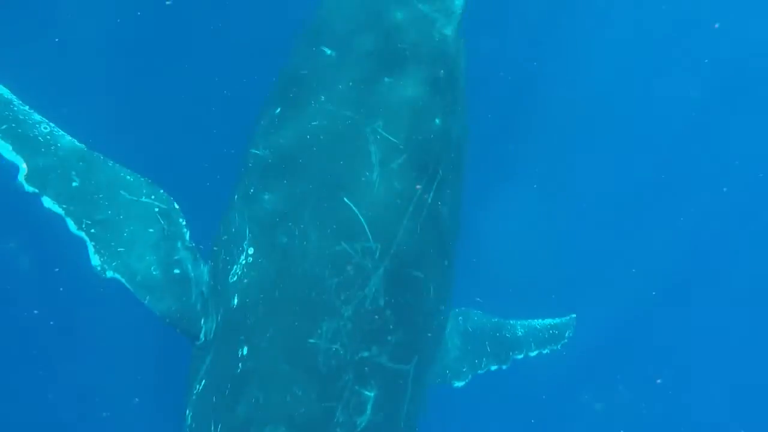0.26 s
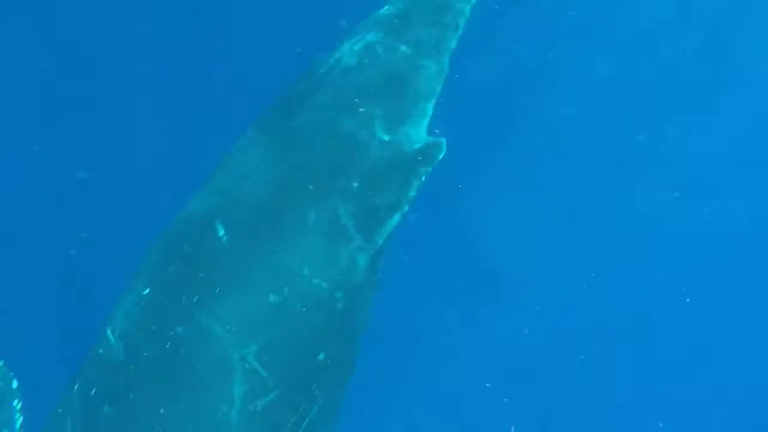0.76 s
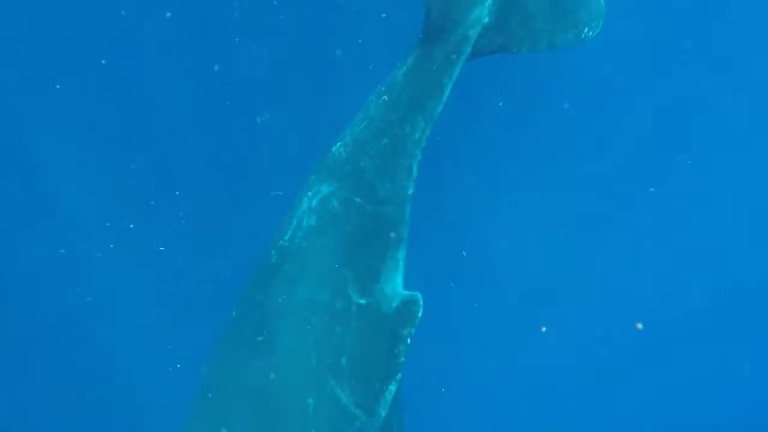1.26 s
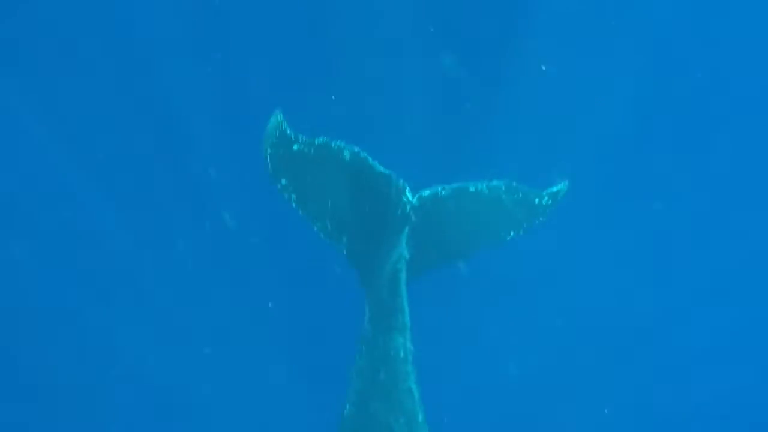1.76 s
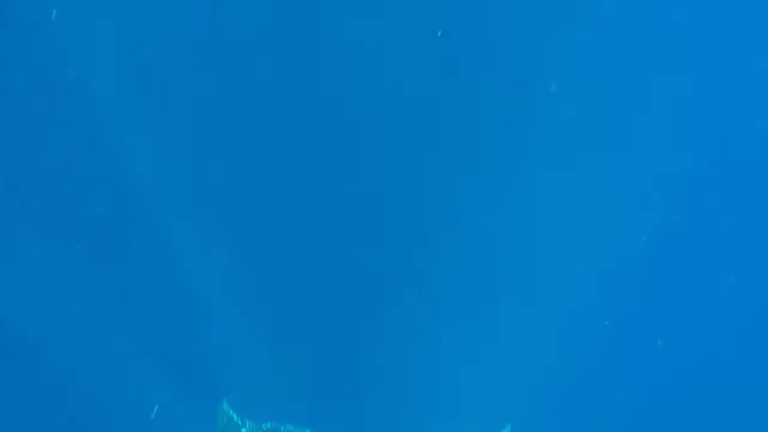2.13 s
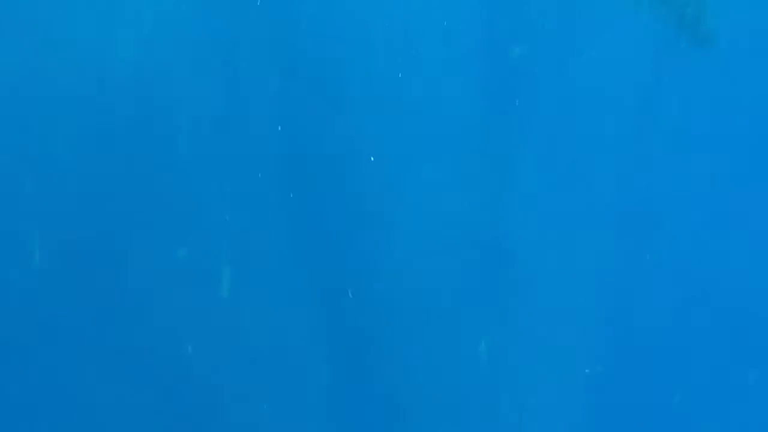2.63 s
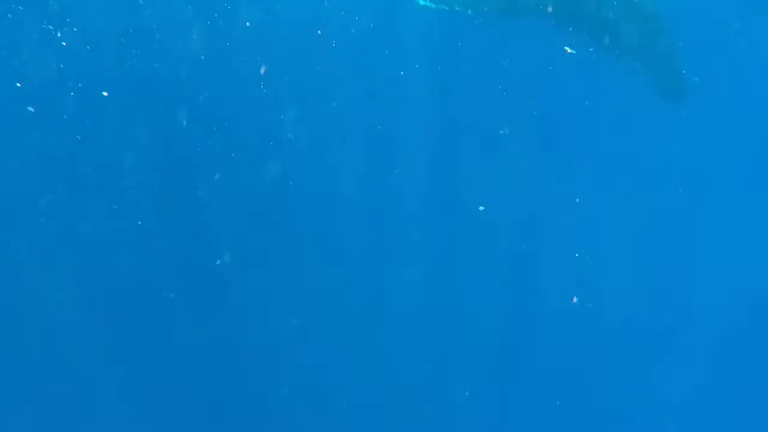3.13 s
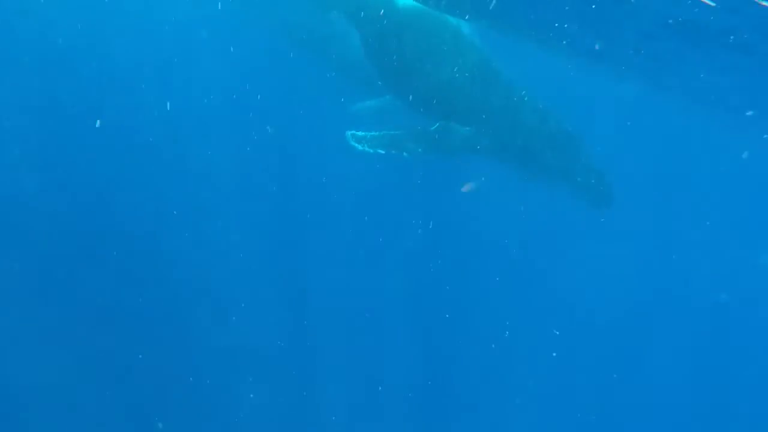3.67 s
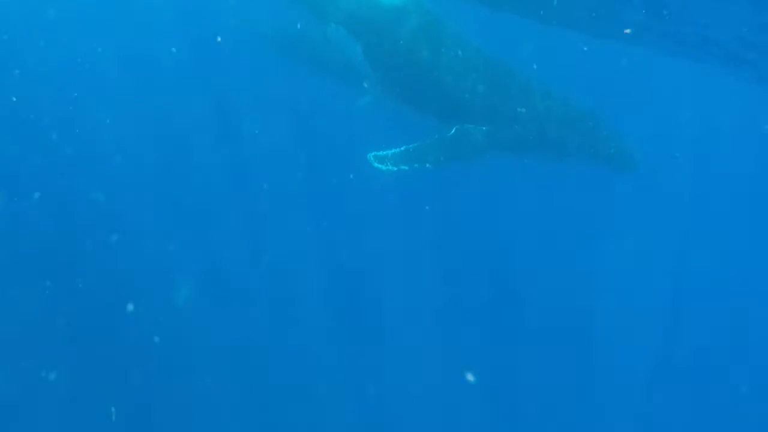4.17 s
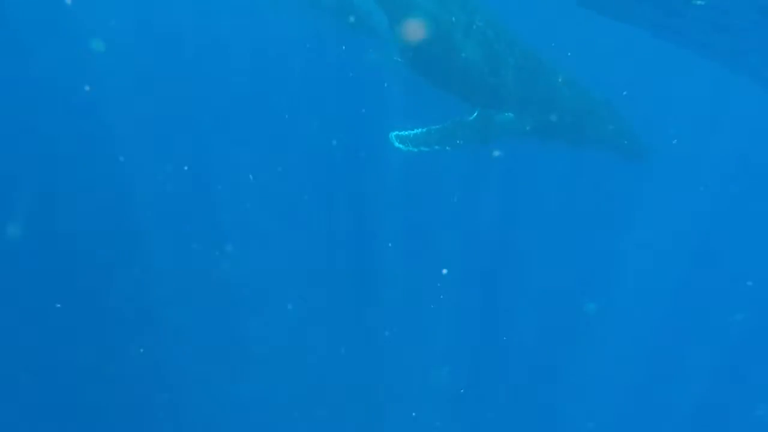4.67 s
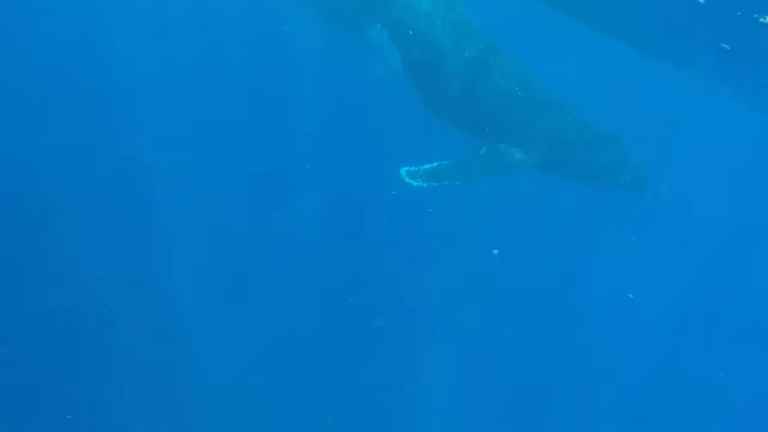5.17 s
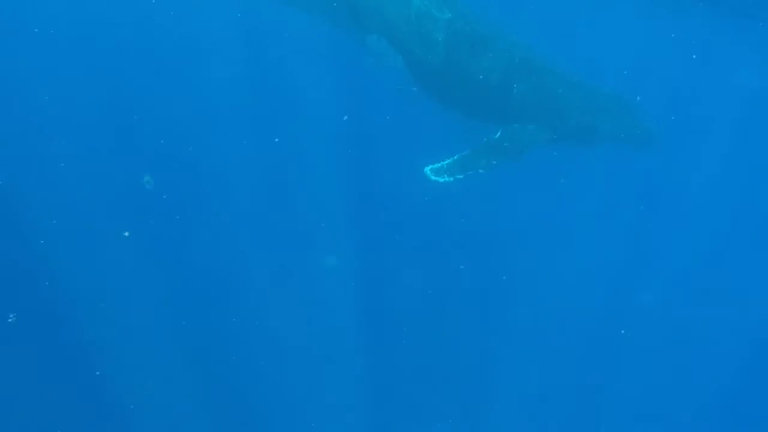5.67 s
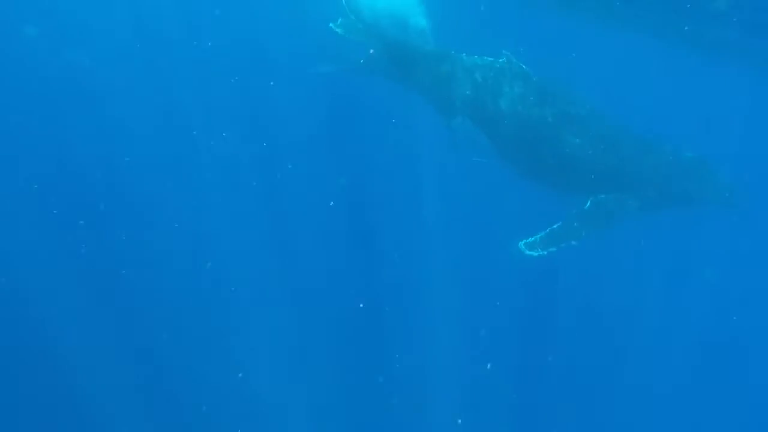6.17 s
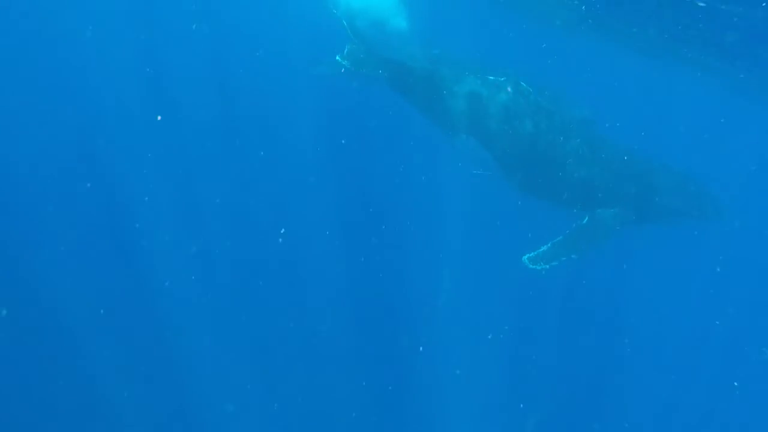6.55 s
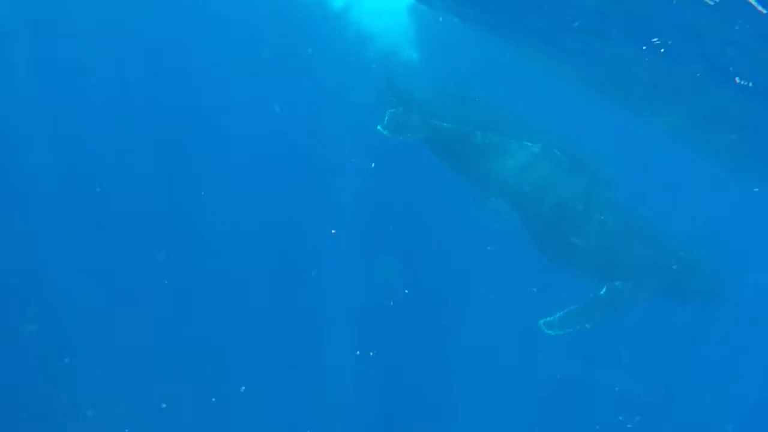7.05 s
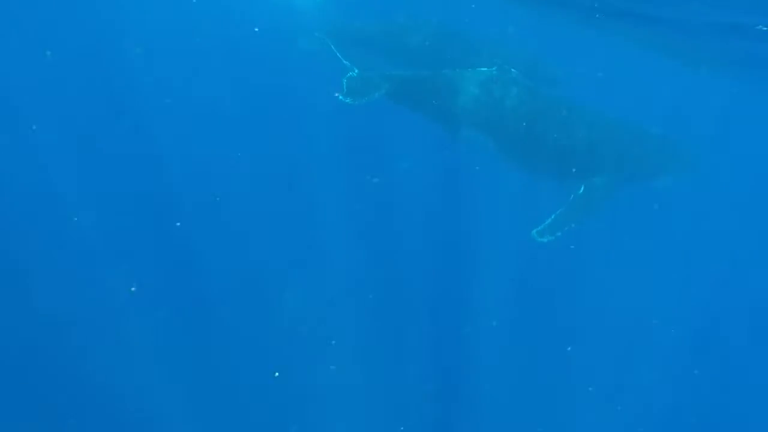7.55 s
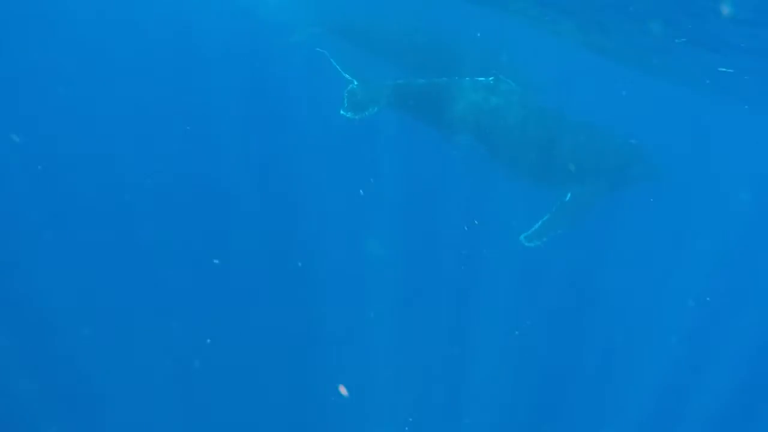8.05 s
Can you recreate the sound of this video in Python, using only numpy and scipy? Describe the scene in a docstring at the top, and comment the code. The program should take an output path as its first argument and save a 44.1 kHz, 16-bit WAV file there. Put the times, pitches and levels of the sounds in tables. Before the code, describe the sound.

Muffled underwater rumble with lumpy surges, bubbling plops and a hollow wavering moan near whales, plus a hard knock on the housing partway through.

```python
"""Water surges against a housing held under water by a swimmer near whales: shaped noise pushes,
and swarms of damped sines thud, gurgle, churn and fizz as bubbles. Noise in narrow resonances gives
a hollow low moan and a thin whine. Single bubbles slide in pitch, filtered pulses plop, and short
noise bursts snap. Treble noise hisses and swishes; pulses with damped sines click on the housing."""
import sys
import numpy as np
from scipy import signal
from scipy.fft import rfft, irfft, next_fast_len
from scipy.io import wavfile
from scipy.ndimage import uniform_filter1d, minimum_filter1d

SR = 44100
rng = np.random.default_rng(int(sys.argv[2]) if len(sys.argv) > 2 else 0)


def master(y):
    """Save y as 16-bit WAV."""
    cut = np.clip(np.atleast_2d(y).T, -1, 1)
    pcm = np.round(cut * 32767)  # scale
    wavfile.write(sys.argv[1], SR, pcm.astype(np.int16))


N = 366471
TIME = np.arange(N) / SR


def amp(db):
    """Turns decibels into a gain."""
    return 10 ** (np.asarray(db) / 20)


def evened(x):
    """Scales a sound to an average (rms) strength of 1."""
    return x / np.sqrt(np.mean(x ** 2) + 1e-20)


def steadied(x, seconds):
    """Holds the strength near 1 over stretches of about this length; faster lumps stay."""
    size = max(int(seconds * SR), 8)
    power = abs(uniform_filter1d(uniform_filter1d(x ** 2, size), size))
    return x / np.sqrt(power + 1e-20)


def curve(rows, order=1):
    """Draws straight lines through one column of a timed table."""
    columns = np.transpose(rows)
    return np.interp(TIME, columns[0], columns[order])


def coloured(x, points):
    """Makes each pitch region louder or softer, following a colour table."""
    size = next_fast_len(N + 8192)
    hz, db = np.transpose(points)
    bins_hz = np.fft.rfftfreq(size, 1 / SR)
    gain = amp(np.interp(np.log(bins_hz + 1), np.log(hz), db))
    return irfft(rfft(x, size) * gain, size)[:N]


def add(mix, s, sound):
    """Mixes a sound in at a time in seconds."""
    part = mix[max(round(s * SR), 0):][:len(sound)]
    part += sound[:len(part)]


def swell(start, length, attack_s, release_s):
    """Rises around its start, holds, then dies away."""
    rise = np.clip((TIME - start) / attack_s + .5, 0, 1)
    return rise * np.exp(-np.clip((TIME - start - length) / release_s, 0, 20))


def lumps(rate_hz, count=30):
    """Wanders unevenly with an rms of 1, by adding slow sines up to the given rate."""
    t = TIME[::256]
    rates_hz = np.linspace(rate_hz / count, rate_hz, count)
    wander = sum(np.sin(2 * np.pi * (hz * t + rng.random())) for hz in rates_hz)
    return evened(np.interp(TIME, t, wander))


def bubble(start_hz, end_hz, t60, settle=0.16, rise_cycles=0.58, rise_share=0.013):
    """A pocket of air rings as a damped sine; its pitch slides while it settles."""
    t = np.arange(int(1.3 * t60 * SR) + 16) / SR
    hz = end_hz + (start_hz - end_hz) * np.exp(-t / (settle * t60))
    rise_s = rise_cycles / start_hz + rise_share * t60  # long-ringing bubbles also start more softly
    onset = (1 - np.exp(-(t / rise_s) ** 2)) ** 2
    envelope = onset * amp(-60 * t / t60)
    return envelope / envelope.max() * np.sin(2 * np.pi * np.cumsum(hz) / SR)


def swarm(low_hz, high_hz, per_s, cycles, spread_db, count=24):
    """Bubbles of many sizes born at random, a few much louder; equal power per Hz."""
    out = np.zeros(N)
    for hz in np.geomspace(low_hz, high_hz, count):
        ring = bubble(hz * rng.uniform(1.0, 1.1944), hz, cycles / hz)
        births_here = int(per_s * N / SR / count)
        when, strength, sign = rng.random((4000, 3))[:births_here].T
        loudness_db = spread_db * np.minimum(-np.log(1 - strength), 4)
        size = amp(loudness_db) * np.sign(sign - .5)
        births = np.bincount((when * N).astype(int), size, N)
        out += signal.oaconvolve(births, ring * np.sqrt(hz) / np.linalg.norm(ring))[:N]
    return evened(out)


def fuzzy_tone(hz, width_hz):
    """Noise in a narrow resonance that follows a pitch."""
    turn = np.exp(2j * np.pi * np.cumsum(hz * np.ones(N)) / SR)
    r = np.exp(-np.pi * width_hz / SR)
    drive = rng.standard_normal(N) + 1j * rng.standard_normal(N)
    slow = signal.lfilter([1], np.poly([r, r]), drive)  # the same damping twice
    return steadied((turn * slow).real, 0.088)  # turning lifts it to the pitch


# surges of water against the housing, before the layer trims:
# start_s, length_s, push_db, thud_db, gurgle_db
SURGES = [(0, 0.043, -30, -34, -19.5), (0.548, 0.061, -16, -34, -24.5), (1.015, 0.12, -17.5, -21.5, -21),
          (1.22, 0.34, -15.5, -22.5, -30), (1.564, 0.14, -16.5, -15, -33), (1.908, 0.15, -16, -27.5, -34),
          (2.569, 0.1, -17.5, -23, -15), (2.69, 0.078, -12, -12.5, -28.5),
          (2.787, 0.08, -15.5, -8.5, -16.5), (2.92, 0.048, -28, -29, -15.5),
          (3.199, 0.014, -34, -17.5, -19.5), (3.544, 0.032, -14.5, -17.5, -20),
          (3.584, 0.047, -25, -8.5, -25), (3.693, 0.04, -30, -11.5, -39), (3.814, 0.072, -16.5, -18, -22.5),
          (3.944, 0.17, -24.5, -34, -29), (4.445, 0.28, -16.5, -18.5, -37), (4.8, 0.045, -19, -29, -29),
          (5.096, 0.072, -21, -7.5, -17.5), (5.193, 0.077, -24, -10.5, -16), (5.266, .035, -22, -6, -29),
          (5.36, 0.039, -21.5, -20, -31), (5.428, 0.11, -20.5, -18.5, -35.5),
          (5.581, 0.051, -16.5, -19, -34.5), (5.646, 0.07, -23, -39, -47),
          (6.233, 0.031, -15.5, -13, -21.5), (6.306, 0.13, -16, -16, -25.5), (6.851, 0.093, -14, -15, -26),
          (6.987, 0.21, -11.5, -21.5, -25.5), (7.237, 0.13, -10, -11.5, -30),
          (7.648, 0.078, -22.5, -21.5, -41), (7.85, 0.079, -19.5, -17.5, -33),
          (8.02, 0.088, -20, -15.5, -32)]
SURGE_ATTACK_S, SURGE_RELEASE_S = 0.0043, 0.0086


def surging():
    """Strength of push, thud and gurgle as the surges pass; the strongest one counts."""
    level = 0
    for start, length, *surge_db in SURGES:
        shape = swell(start, length, SURGE_ATTACK_S, SURGE_RELEASE_S)
        level = np.maximum(level, amp(surge_db)[:, None] * shape)
    return level


# colour filter of the push: pitch_hz, gain_db
FLOW_COLOUR = [(5, -22.5), (15, -15), (26, 5.5), (45, -3), (62, 1.5), (80, -15.5), (120, -23.5), (400, -79),
               (2000, -130)]
# colour filter of the thuds: pitch_hz, gain_db
THUD_COLOUR = [(35, -17), (60, -8.5), (80, 4), (125, 1), (160, -9.5), (210, -16), (500, -61)]
# colour filter of the gurgle: pitch_hz, gain_db
GURGLE_COLOUR = [(100, -22), (150, 4), (180, -1.5), (280, 0.5), (335, 1.5), (450, -27), (800, -57.5)]
# wash between the surges, before lumps and layer trims: time_s, rumble_db, gurgle_db
WASH = [(0, -22.5, -23), (.8, -26.5, -30.5), (1.3, -20, -26), (1.8, -29, -25.5), (2.4, -25, -22.5),
        (2.85, -21, -29), (3.08, -24.5, -39), (3.35, -31.5, -37), (3.65, -20.5, -32.5), (4.3, -36, -29),
        (4.7, -32, -38), (4.95, -28.5, -31.5), (5.25, -16, -34), (5.8, -34.5, -43), (6.3, -22.5, -28),
        (6.62, -39.5, -31), (7.3, -19, -25), (7.55, -26, -33), (8.31, -21.5, -30.5)]
WASH_THUD_DB = -3.5  # thuds of the wash, relative to its rumble
WASH_LUMPS_DB, WASH_LUMPS_HZ = 2, 9  # rms size and fastest rate of the lumps
PUSH_DB, THUD_DB, GURGLE_DB = 1, -2, -0.3  # layer trims


def flow(surges):
    """Surges push and thud on the housing and set big air pockets gurgling, over a lumpy wash."""
    push = steadied(coloured(rng.standard_normal(N), FLOW_COLOUR), 0.2)
    big = swarm(50.3, 216.0, per_s=120, cycles=8.0, spread_db=1.0)
    thuds = steadied(coloured(big, THUD_COLOUR), 0.049)
    pockets = swarm(127.0, 423.0, per_s=110, cycles=14.8, spread_db=2.0)
    gurgle = steadied(coloured(pockets, GURGLE_COLOUR), 0.064)
    rumble_db = curve(WASH)
    wash = amp([rumble_db, rumble_db + WASH_THUD_DB, curve(WASH, order=2)])
    wash = wash * amp(WASH_LUMPS_DB * lumps(WASH_LUMPS_HZ))
    layers = [push * amp(PUSH_DB), thuds * amp(THUD_DB), gurgle * amp(GURGLE_DB)]
    return (np.maximum(wash, surges) * layers).sum(axis=0)


# centre pitch of the moan: time_s, pitch_hz
MOAN_PITCH = [(0, 421.7), (1, 423.8), (1.3, 380.3), (1.9, 389.6), (2.4, 354.5), (2.8, 359.5), (3.7, 400),
              (6.3, 386.9), (7.3, 394.8), (8.3, 398.4)]
# swells of the moan, level at mid-swell before lumps: start_s, length_s, level_db
MOANS = [(0, 0.74, -23), (0.607, 0.9, -25), (1.2, 0.6, -17.5), (1.726, 0.74, -17), (2.578, 0.23, -21),
         (3.615, 0.69, -26.5), (4.327, 0.045, -24), (5.03, 0.25, -21), (5.356, 0.12, -29),
         (5.498, 0.18, -34), (6.094, 0.26, -22), (6.569, 0.28, -24), (6.893, 0.53, -31), (7.108, 0.28, -18),
         (8.096, 0.27, -35.5)]
MOAN_ATTACK_S, MOAN_RELEASE_S = 0.061, 0.05
MOAN_ARCH_DB, MOAN_REST_DB = 5, -66  # drop from the middle of a swell to its ends; level between swells
MOAN_WIDTH_HZ, MOAN_CORE_WIDTH_HZ = 110, 28.6  # each resonance is applied twice
MOAN_CORE_DB = 1.25  # core relative to the wide tone
MOAN_LUMPS_DB, MOAN_LUMPS_HZ = 0.9, 10  # the moan throbs unevenly


def moan():
    """A hollow tone of resonant noise with a clearer core, which comes in arching swells."""
    pitch = curve(MOAN_PITCH)
    wide = fuzzy_tone(pitch, MOAN_WIDTH_HZ)
    core = fuzzy_tone(pitch, MOAN_CORE_WIDTH_HZ)
    tone = wide + amp(MOAN_CORE_DB) * core
    level = amp(MOAN_REST_DB)
    for start, length, db in MOANS:
        off_centre = np.clip(2 * (TIME - start) / length - 1, -1, 1)
        arch = amp(db - MOAN_ARCH_DB * off_centre ** 2)
        level = np.maximum(level, arch * swell(start, length, MOAN_ATTACK_S, MOAN_RELEASE_S))
    return steadied(tone, 0.12) * level * amp(MOAN_LUMPS_DB * lumps(MOAN_LUMPS_HZ))


# colour filter of the churning bubbles: pitch_hz, gain_db
CHURN_COLOUR = [(180, -20.5), (330, -2.5), (450, 1), (560, -1), (700, -5.5), (800, -11), (895, -9.5),
                (980, -18), (1120, -30), (1500, -55), (2500, -52.5)]
# bubbles churning at the surface, before trim and lumps: time_s, level_db
CHURN = [(0.0, -24.5), (.33, -29.5), (0.71, -23), (1.48, -31.5), (1.83, -27), (2.1, -27), (2.64, -29.5),
         (3.01, -42), (3.63, -37.5), (4.4, -38.5), (4.95, -29), (5.37, -40), (5.76, -41), (6.04, -39),
         (6.2, -34.5), (7.13, -33), (7.48, -41), (7.8, -46), (8.31, -34.5)]
CHURN_DB = 2  # trim
CHURN_LUMPS_DB, CHURN_LUMPS_HZ = 1.0, 6
# bursts of churning bubbles: start_s, length_s, level_db
BURSTS = [(0.239, 0.028, -22.5), (2.735, 0.051, -26), (2.934, 0.0067, -27), (3.434, 0.07, -27),
          (4.497, 0.0081, -19.5), (5.072, 0.082, -27), (5.545, 0.0074, -29), (6.308, 0.031, -24),
          (7.1, 0.019, -22.5)]
BURST_ATTACK_S, BURST_RELEASE_S = 0.0096, 0.02


def churn():
    """A dense crowd of middling bubbles rings at the surface, with short louder bursts."""
    crowd = swarm(309.3, 1434.5, per_s=1100, cycles=43.6, spread_db=1.5, count=36)
    crowd = coloured(crowd, CHURN_COLOUR)
    level = amp(curve(CHURN) + CHURN_DB + CHURN_LUMPS_DB * lumps(CHURN_LUMPS_HZ))
    for start, length, db in BURSTS:
        level = np.maximum(level, amp(db) * swell(start, length, BURST_ATTACK_S, BURST_RELEASE_S))
    return steadied(crowd, 1.0) * level


# spells in which the top of the hiss fades: start_s, length_s, depth_db
DULL_SPELLS = [(3.04, 0.36, -7), (4.13, 0.19, -11), (5.295, 0.32, -2), (7.194, 0.5, -2)]
DULL_FADE_S, DULL_ABOVE_HZ = .18, 8400


def dulled(hiss):
    """Fades the top of a hiss during the dull spells."""
    high_pass = signal.butter(5, DULL_ABOVE_HZ, "highpass", fs=SR, output="sos")
    top = signal.sosfiltfilt(high_pass, hiss)
    depth_db = sum(db * swell(start, length, DULL_FADE_S, DULL_FADE_S / 2)
                   for start, length, db in DULL_SPELLS)
    return hiss + top * (amp(depth_db) - 1)


# colour filter of the fine spray: pitch_hz, gain_db
FIZZ_COLOUR = [(700, -4.5), (1200, 6.5), (1600, 0), (2300, -1), (2600, -5), (2900, -10), (4200, -13),
               (5200, -23.5), (9000, -46), (15000, -73.5)]
# fine spray of tiny bubbles, before trim: time_s, level_db
FIZZ = [(0.0, -53.5), (0.74, -50.5), (1.5, -53.5), (2.66, -52.5), (2.98, -58), (3.21, -57.5), (3.49, -49.5),
        (3.66, -59), (3.91, -61), (4.26, -55.5), (4.63, -51.5), (5.05, -53), (5.23, -56), (5.53, -59),
        (6.25, -53), (7.03, -52.5), (7.48, -55.5), (8.31, -53)]
# colour filter of the treble hiss: pitch_hz, gain_db
HISS_COLOUR = [(2000, -7.5), (3500, -4), (6000, -2), (7200, -4.5), (8400, 0), (10000, -2.5), (11500, -9),
               (13500, -15.5), (15000, -34.5)]
# treble hiss, before trim, lumps and dulling: time_s, level_db
HISS = [(0.0, -64), (0.35, -63.5), (0.62, -60.5), (1.41, -64), (2.17, -64), (2.75, -60), (3.03, -65.5),
        (3.52, -65), (3.7, -64.5), (4.3, -64.5), (4.63, -64), (4.98, -62), (5.21, -65.5), (5.55, -68),
        (6.32, -63.5), (7.01, -63), (7.48, -66.5), (8.31, -65.5)]
FIZZ_DB, HISS_DB = 0.5, -0.5  # trims
HISS_LUMPS_DB, HISS_LUMPS_HZ = 1.6, 22.1
# colour filter of the rasping crackle: pitch_hz, gain_db
RASP_COLOUR = [(1400, -23), (2100, -2.5), (2500, 2.5), (2750, -10.5), (3100, -10), (4200, -19.5),
               (5500, -38)]
# short spells of crackle, added to its resting level: start_s, length_s, level_db
RASPS = [(0.945, 0.098, -55), (1.055, 0.1, -59.5), (1.171, 0.042, -54.5), (2.34, 0.13, -60.5),
         (4.601, 0.58, -60)]
RASP_ATTACK_S, RASP_RELEASE_S, RASP_REST_DB = 0.016, 0.0092, -74


def fizz():
    """Noise and tiny ringing bubbles make spray and hiss, with spells of rasping crackle."""
    small = rng.standard_normal(N) + amp(-11.5) * swarm(1100, 4800, per_s=240, cycles=55, spread_db=3.5)
    spray = evened(coloured(small, FIZZ_COLOUR)) * amp(curve(FIZZ) + FIZZ_DB)
    tiny = rng.standard_normal(N) + amp(-11.0) * swarm(4800, 10500, per_s=220, cycles=31, spread_db=3.5)
    hiss_level = amp(curve(HISS) + HISS_DB + HISS_LUMPS_DB * lumps(HISS_LUMPS_HZ))
    hiss = dulled(evened(coloured(tiny, HISS_COLOUR))) * hiss_level
    rasp = swarm(1700, 4600, per_s=560, cycles=32, spread_db=5.0)
    spells = amp(RASP_REST_DB) + sum(amp(db) * swell(start, length, RASP_ATTACK_S, RASP_RELEASE_S)
                                     for start, length, db in RASPS)
    crackle = steadied(coloured(rasp, RASP_COLOUR), .1) * spells
    return spray + hiss + crackle


# single bubbles; the ring time is that of a 60 dB decay:
# time_s, peak_db, starting_pitch_hz, final_pitch_hz, ring_s
BUBBLES = [ (0.026, -10, 545, 441, 0.12), (0.04, -7, 261, 223, 0.19), (.158, -12.5, 439, 505, 0.15),
           (.185, -20, 710, 684, 0.11), (0.239, -3.5, 408, 380, 0.031), (.243, -10, 647, 537, 0.11),
           (.32, -9, 554, 434, 0.054), (.357, -9, 335, 311, 0.19), (.449, -10, 540, 496, 0.24),
           (.451, -12.5, 650, 584, 0.039), (.503, -8, 454, 423, 0.12), (.559, -9.5, 602, 660, 0.043),
            (0.669, -23.5, 858, 950, 0.11), (1.042, -37.5, 2480, 2480, 0.02), (1.125, -6, 493, 436, 0.079),
           (1.136, -7.5, 264, 237, 0.09), (1.211, -10, 525, 398, 0.066), (1.212, -14, 287, 265, 0.12),
           (1.345, -18, 533, 510, 0.27), (1.503, -7, 375, 362, 0.13), (1.669, -8, 126, 112, 0.11),
           (1.781, -9.5, 598, 575, 0.064), (1.865, -5, 417, 386, 0.13), (1.947, -20, 587, 478, 0.078),
           (2.16, -12, 453, 494, 0.075), (2.275, -8, 390, 372, 0.19), (2.482, -12.5, 487, 487, 0.13),
           (2.61, -22, 197, 180, 0.066), (2.8, -13, 320, 302, 0.09), (2.565, -5.5, 304, 280, 0.064),
           (2.941, -7, 530, 185, 0.068), (2.963, -40, 2030, 1900, .024), (2.982, -15.5, 508, 520, 0.081),
           (3.213, -8.5, 370, 149, 0.012), (3.216, -17.5, 576, 497, 0.031), (3.229, -12, 163, 158, 0.088),
           (3.345, -27.5, 890, 890, 0.063), (3.44, -20, 357, 300, 0.1), (3.451, -17, 522, 643, 0.053),
           (3.583, -5, 427, 284, 0.029), (3.598, -5.5, 423, 298, 0.035), (3.632, -39.5, 2330, 2260, 0.018),
           (3.648, -16, 396, 439, 0.32), (3.662, -38.5, 2260, 2220, 0.025), (3.996, -10.5, 162, 165, 0.075),
           (4.087, -12.5, 457, 360, 0.12), (4.437, -29.5, 1290, 1300, 0.075),
           (4.499, -21, 1010, 890, 0.021), (4.504, -26.5, 1130, 1190, 0.044),
           (4.501, -42, 2040, 2140, 0.048), (4.503, -7, 636, 514, 0.088), (4.632, -22.5, 763, 720, 0.1),
           (4.599, -28, 341, 275, 0.24), (4.666, -14, 236, 202, 0.34), (4.751, -18.5, 755, 720, 0.035),
           (4.793, -34.5, 2180, 2280, .026), (4.882, -9, 463, 442, 0.15), (4.886, -15.5, 293, 270, 0.076),
           (4.933, -17.5, 482, 484, 0.2), (4.936, -21, 830, 900, .042), (4.958, -46, 4150, 4220, 0.022),
           (4.983, -38, 2420, 2480, 0.027), (5.122, -18.5, 706, 660, 0.061), (5.143, -9, 330, 317, 0.073),
           (5.162, 1.5, 220, 189, 0.048), (5.255, -12, 286, 297, 0.1), (5.258, -27, 905, 943, 0.092),
           (5.355, -17.5, 372.5, 366.3, 0.26), (6.001, -25.5, 820, 900, 0.087),
           (6.261, -11, 183, 170, 0.073), (6.327, -27, 1080, 980, 0.037), (6.414, -19.5, 213, 203, 0.091),
           (6.447, -10.5, 163, 154, 0.09), (6.441, -23, 615, 487, 0.072), (7.045, -35, 1180, 1270, 0.059),
           (7.124, -13.5, 337, 392, 0.18), (7.157, -18, 897, 887, 0.13), (7.184, -17.5, 732, 743, 0.097),
           (7.66, -37, 1350, 1260, 0.05), (7.698, -16.5, 274, 212, 0.04), (7.832, -15.5, 266, 195, 0.043),
           (8.004, -15, 168, 161, 0.11), (8.089, -14, 265, 307, 0.054)]


def near_bubbles():
    """Bubbles close by ring as damped sines, with falling, rising or steady pitch."""
    out = np.zeros(N)
    for s, db, start_hz, end_hz, t60 in BUBBLES:
        add(out, s, amp(db) * bubble(start_hz, end_hz, t60))
    return out


# sharp little snaps in the water: time_s, peak_db, centre_hz
SNAPS = [(.091, -49, 9700), (.312, -47, 4700), (.455, -43, 8000), (.601, -45, 8000), (0.745, -42.5, 8400),
         (.87, -44, 9200), (1.12, -47, 4040), (1.149, -50, 5070), (1.329, -44, 9100), (1.66, -43, 7700),
         (1.661, -44, 5230), (2.35, -46, 3700), (2.541, -44, 8700), (2.6115, -39, 8860), (2.739, -43, 8700),
         (2.794, -41, 8800), (2.8255, -48, 9800), (2.881, -45, 9000), (3.4855, -45, 8560),
         (3.5765, -34, 8800), (3.577, -43, 12000), (3.5865, -37, 9100), (3.6046, -37, 8500),
         (3.605, -44, 11000), (4.487, -42, 8700), (4.57, -41, 2200), (4.633, -40, 2280), (4.648, -47, 5200),
         (4.747, -48, 2700), (4.834, -48, 5200), (4.87, -52, 3470), (4.912, -41, 2570), (4.931, -48, 4200),
         (4.97, -43.5, 8060), (5.092, -46, 4170), (5.095, -41, 8900), (5.2465, -47, 9400),
         (5.738, -45, 8500), (5.99, -46, 8600), (6.006, -39.5, 8800), (6.3485, -45, 8500),
         (7.054, -46.5, 5800), (7.111, -46, 3300), (7.4216, -39.5, 8600), (7.422, -45, 5200),
         (7.544, -45, 7700), (7.653, -47, 9300), (7.79, -52, 5100)]
SNAP_DECAY_CYCLES, SNAP_WIDTH = 9.0, .18  # decay in cycles of the centre; width as a share of it


def snaps():
    """Each snap is a tiny burst of noise in one narrow band."""
    out, t = np.zeros(N), np.arange(1024) / SR
    for s, db, hz in SNAPS:
        edges_hz = hz * np.exp([-SNAP_WIDTH / 2, SNAP_WIDTH / 2])
        band = signal.butter(3, edges_hz, "bandpass", fs=SR, output="sos")
        burst = rng.standard_normal(len(t)) * np.exp(-t * hz / SNAP_DECAY_CYCLES)
        snap = signal.sosfilt(band, burst)
        add(out, s, amp(db) * snap / abs(snap).max())
    return out


# dull plops of collapsing air pockets: time_s, peak_db, lowest_hz, highest_hz
PLOPS = [(.243, -15, 250, 795), (.392, -14, 480, 710), (.536, -18, 397, 800), (2.939, -11.5, 250, 815),
         (3.084, -22, 120, 370), (3.215, -5, 130, 610), (3.797, -13.5, 200, 640), (3.948, -18, 333, 814),
         (4.228, -18, 454, 720), (4.502, -27, 497, 1080), (5.369, -13, 280, 770), (5.552, -9, 173, 760),
         (6.07, -24, 580, 774), (6.092, -14.5, 424, 750), (7.663, -30, 500, 1500), (7.695, -20, 160, 830),
         (7.83, -17.5, 160, 790), (8.096, -16, 223, 530)]


def plops():
    """Each collapse is one pressure pulse, heard in its own band."""
    out = np.zeros(N)
    for s, db, low_hz, high_hz in PLOPS:
        band = signal.butter(7, [low_hz, high_hz], "bandpass", fs=SR, output="sos")
        plop = signal.sosfilt(band, signal.unit_impulse(4096))
        add(out, s, amp(db) * plop / abs(plop).max())
    return out


# soft swishes in the treble: start_s, length_s, centre_hz, level_db
SWISHES = [(0.454, 0.21, 5370, -69.5), (2.745, 0.018, 5750, -61), (3.73, 0.26, 9200, -69.5),
           (4.146, .28, 4600, -66.5), (7.03, 0.2, 5400, -70)]
SWISH_ATTACK_S, SWISH_RELEASE_S = .04, .035
SWISH_WIDTH = 0.41  # width of each of two filter passes, as a share of the centre


def swishes():
    """Bands of filtered noise swell and fade."""
    out = np.zeros(N)
    for start, length, hz, db in SWISHES:
        b, a = signal.iirpeak(hz, 1 / SWISH_WIDTH, fs=SR)
        once = signal.lfilter(b, a, rng.standard_normal(N))
        band = signal.lfilter(b, a, once)
        out += evened(band) * amp(db) * swell(start, length, SWISH_ATTACK_S, SWISH_RELEASE_S)
    return out


# swells of a faint higher whine: start_s, length_s, level_db
WHINES = [(0.546, 0.36, -39), (6.895, 0.037, -46), (7.285, 0.15, -44.5)]
WHINE_HZ, WHINE_WIDTH_HZ = 920, 35  # the resonance is applied twice


def whine():
    """Noise in a narrow resonance makes a thin higher tone that comes and goes."""
    level = sum(amp(db) * swell(start, length, MOAN_ATTACK_S, MOAN_RELEASE_S)
                for start, length, db in WHINES)
    return fuzzy_tone(WHINE_HZ, WHINE_WIDTH_HZ) * level


# colour of the dry crack in a click, before focusing: pitch_hz, gain_db
CRACK_COLOUR = [(400, -18), (1200, 17), (2200, 13), (2800, -6), (3500, 0.5), (4700, 3.5), (5600, -33.5),
                (7000, -27.5), (8700, -16.5), (11000, -29.5), (15000, -47.5)]
# ringing tones of the housing, level before focusing, time of a 60 dB decay: pitch_hz, level_db, ring_s
HOUSING = [(900, 15, 0.018), (1050, 1, 0.037), (1800, 1.5, 0.014), (1903, 7, 0.01), (2160, -8.5, 0.019),
           (3574, 1, 0.0062), (3900, -14.5, 0.013), (4670, -17, 0.011), (8700, -22.5, 0.0042)]
# knocks and clicks on the housing; the focus is the favoured pitch, the crack is relative to the ring:
# time_s, peak_db, focus_hz, crack_db
CLICKS = [(2.428, -38, 3300, 5), (2.8254, -36, 2600, 15), (3.486, -27.5, 1900, 0), (3.571, -31, 2500, -4),
          (3.5839, -6.5, 1950, -11), (3.5843, -22.5, 5000, -9), (3.586, -26, 2500, 2),
          (3.5922, -25, 2100, -15), (3.5995, -12, 1800, 6), (3.5991, -9, 3570, -22),
          (3.605, -14, 1700, -12), (3.613, -36, 3400, -1), (3.639, -44, 3300, -14),
          (4.386, -30.5, 3600, 31), (4.586, -26.5, 2600, 20), (5.047, -35, 4300, 7), (5.167, -35, 3200, -7),
          (6.338, -40, 3700, -12), (7.422, -38, 4000, 16)]
CLICK_FOCUS_DB, CRACK_FOCUS_DB = 17, 8  # loss per octave away from the focus, for ring and crack


def clicks():
    """Each tap is one sharp pulse and a short ring of the housing, focused around one pitch."""
    out, t = np.zeros(N), np.arange(2048) / SR
    bins = abs(np.fft.fftfreq(len(t), 1 / SR)) + 1
    crack_hz, crack_db = np.transpose(CRACK_COLOUR)
    colour_db = np.interp(np.log(bins), np.log(crack_hz), crack_db)
    for s, db, focus_hz, dry_db in CLICKS:
        ring = 0
        for hz, mode_db, t60 in HOUSING:
            focused_db = mode_db - CLICK_FOCUS_DB * abs(np.log2(hz / focus_hz))
            ring = ring + amp(focused_db - 60 * t / t60) * np.sin(2 * np.pi * hz * t)
        ring = ring * (1 - np.exp(-t / 0.0031))  # soft onset
        gain = amp(colour_db - CRACK_FOCUS_DB * abs(np.log2(bins / focus_hz)))
        # minimum phase: the energy of the pulse comes as early as this colour allows
        crack = np.fft.ifft(np.exp(signal.hilbert(np.log(gain)).conj())).real
        tap = ring / abs(ring).max() + amp(dry_db) * crack / abs(crack).max()
        add(out, s, amp(db) * tap / abs(tap).max())
    return out


def scene():
    """Everything heard through the housing, in mono."""
    water = flow(surging()) + moan() + churn() + fizz()
    details = near_bubbles() + snaps() + plops() + swishes() + whine() + clicks()
    return (water + details)[None]


EDGE_HZ = 15100  # upper band limit


def record(dry):
    """A fast limiter eases the highest peaks down; then a low-pass filter limits the band."""
    room = np.minimum(1, .93 / (abs(dry) + 1e-9))  # gain that keeps each sample within .93
    held = minimum_filter1d(room, size=260)
    gain = uniform_filter1d(uniform_filter1d(held, size=130), size=130)
    low_pass = signal.firwin(511, EDGE_HZ, window=("kaiser", 9), fs=SR)
    return signal.oaconvolve(dry * gain, low_pass[None], "same")


dry = scene()
out = record(dry)
master(out)
```